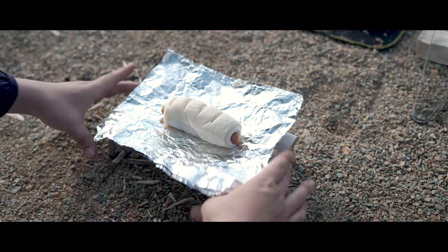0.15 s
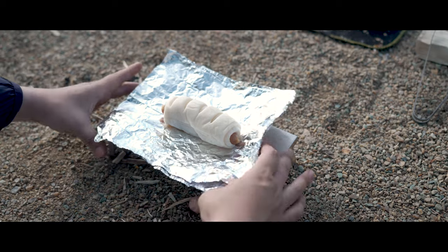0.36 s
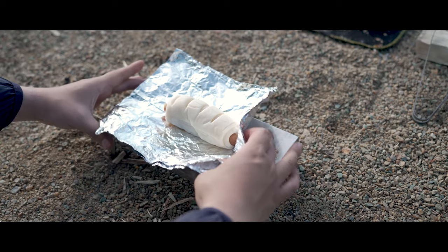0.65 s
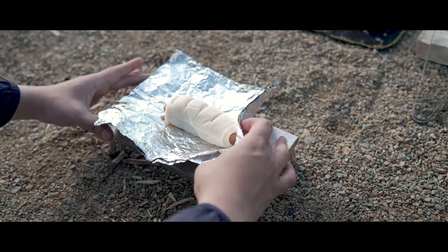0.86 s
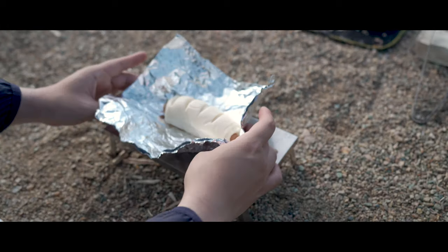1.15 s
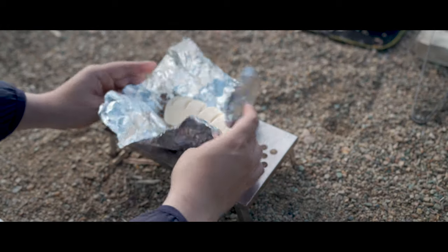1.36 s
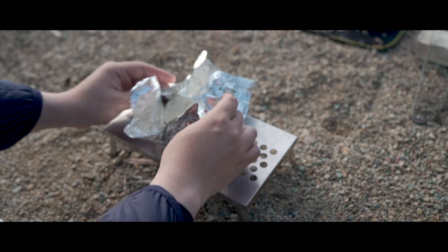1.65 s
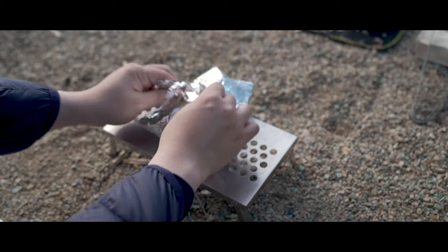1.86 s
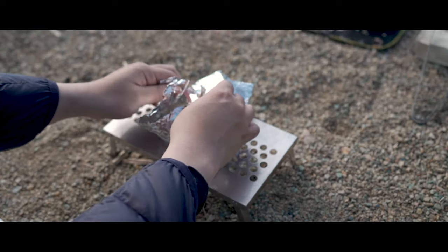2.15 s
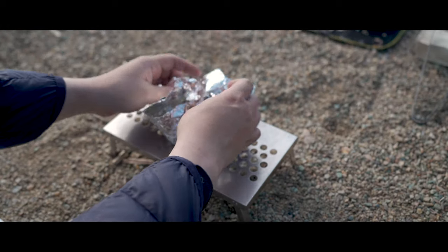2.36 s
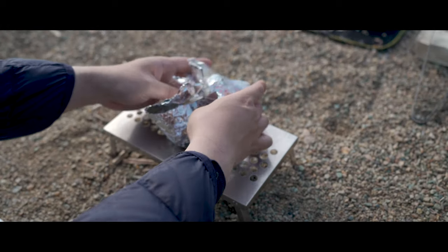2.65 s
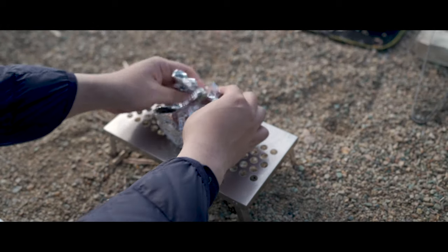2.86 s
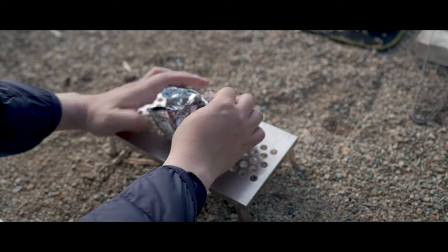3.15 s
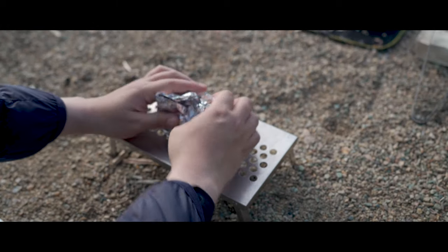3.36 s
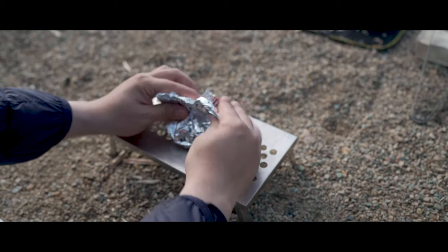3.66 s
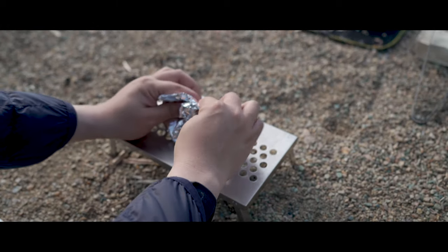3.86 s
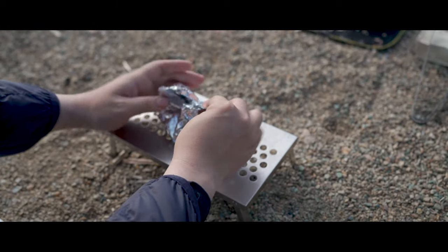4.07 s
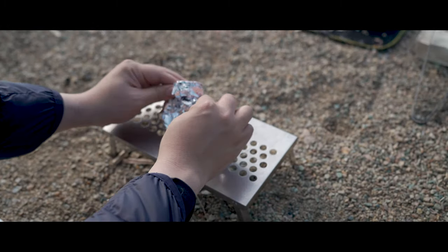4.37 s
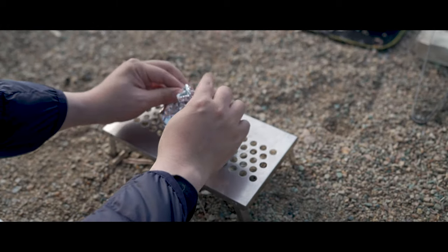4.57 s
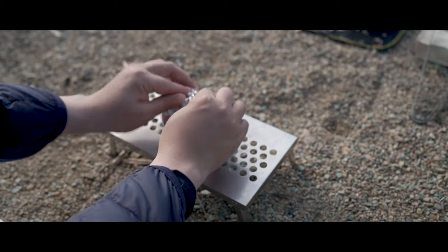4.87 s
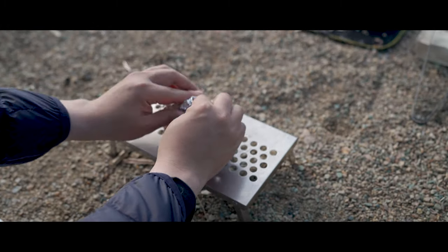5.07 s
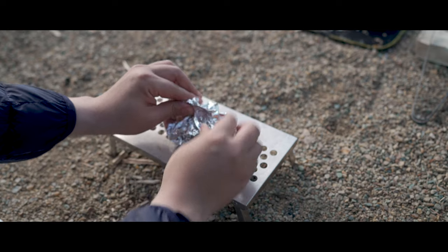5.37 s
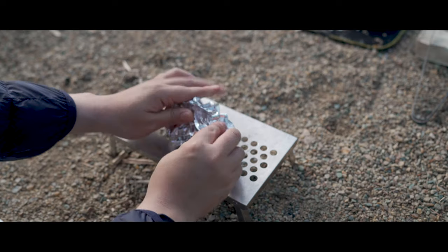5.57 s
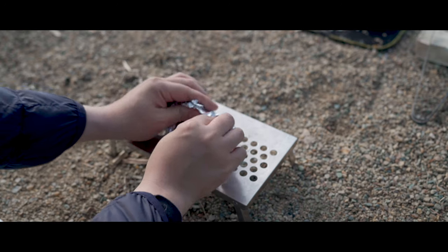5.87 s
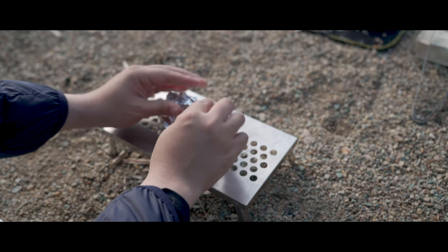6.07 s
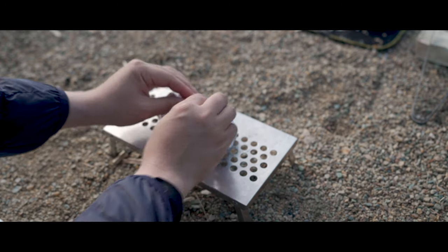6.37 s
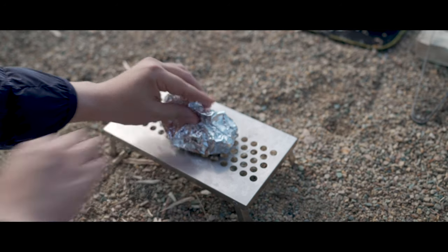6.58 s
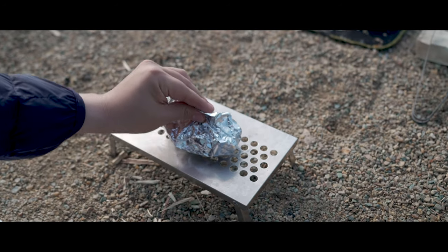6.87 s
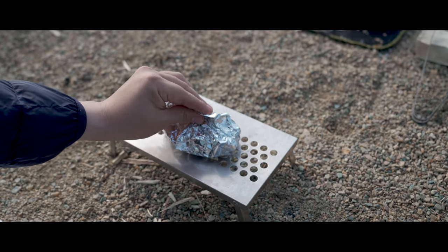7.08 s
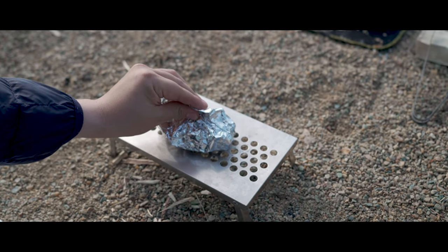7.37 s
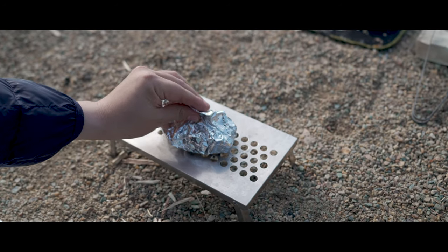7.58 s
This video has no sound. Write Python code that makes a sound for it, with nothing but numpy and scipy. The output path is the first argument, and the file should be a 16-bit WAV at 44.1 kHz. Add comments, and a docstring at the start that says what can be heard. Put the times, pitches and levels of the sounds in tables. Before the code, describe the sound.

Outdoors, close to the microphone, hands fold aluminium foil around food. The crinkling starts lightly, then comes in repeated squeezes of dense, bright crackle with sharp single snaps. The parcel taps a low metal table now and then and drags briefly across it once. Near the end the crackle thins out and a nylon sleeve swishes. A steady low rumble and occasional faint rasps lie behind.

```python
"""Outdoors at a low metal camp table, one microphone close to hands folding aluminium foil around food.
A steady low rumble fills the air; a nylon sleeve swishes and a narrow rasp comes now and then.
The parcel taps the table and drags over it once, ringing the metal. In front, each squeeze buckles
small creases in a dense crackle that the folded sheet colours, and single creases flip in loud snaps."""
import sys
import numpy as np
from scipy import signal
from scipy.fft import rfft, irfft
from scipy.io import wavfile
from scipy.ndimage import uniform_filter1d

SR = 44100
rng = np.random.default_rng(int(sys.argv[2]) if len(sys.argv) > 2 else 0)


def put_to_file(sound):
    """Save the sound as 16-bit audio at rate SR, in the file named by the first command-line argument."""
    columns = np.atleast_2d(sound).T  # one column per channel
    safe = np.clip(columns, -1, 1)
    whole_steps = np.round(safe * 32767)
    wavfile.write(sys.argv[1], SR, whole_steps.astype(np.int16))


N = 340893


def from_db(db):
    return 10 ** (np.asarray(db) / 20)


def rms_one(x):
    return x / np.sqrt(np.mean(x ** 2) + 1e-20)


def peak_one(x):
    return x / abs(x).max()


def in_time(rows):
    """Rows of (time [s], values...) as one curve per value, sample by sample."""
    times, *columns = np.transpose(rows)
    return [np.interp(np.arange(N) / SR, times, column) for column in columns]


def at_hz(spectrum, hz):
    """Level of a spectrum at hz, on a log frequency axis."""
    points_hz, db = np.transpose(spectrum)
    return np.interp(np.log(hz), np.log(points_hz), db)


def drift(rate_hz):
    """Slow random wander: noise at every 20th sample through a double one-pole low-pass; rms 1."""
    r = np.exp(-2 * np.pi * rate_hz * 20 / SR)
    slow = signal.lfilter([1], [1, -2 * r, r * r], rng.standard_normal(N // 20 + 2002))[2000:]
    return np.interp(np.arange(N) / 20, np.arange(len(slow)), rms_one(slow))


def coloured_noise(spectrum):
    """Steady noise with the given spectrum; rms 1."""
    hz = np.maximum(np.fft.rfftfreq(N, 1 / SR), 1)
    return rms_one(irfft(rfft(rng.standard_normal(N)) * from_db(at_hz(spectrum, hz)), N))


def band(x, low_hz, high_hz):
    return signal.sosfilt(signal.butter(2, [low_hz, high_hz], "band", fs=SR, output="sos"), x)


def resonator(hz, width_hz):
    """Coefficients of a two-pole resonance with gain 1 at its peak."""
    r = np.exp(-np.pi * width_hz / SR)
    return (1 - r * r) / 2 * np.array([1, 0, -1]), [1, -2 * r * np.cos(2 * np.pi * hz / SR), r * r]


def resonance(x, hz, width_hz):
    return signal.lfilter(*resonator(hz, width_hz), x)


def gliding_resonance(x, hz, width_hz):
    """A resonance whose centre moves every 256 samples."""
    out, state = np.zeros(N), np.zeros(2)
    for i in range(0, N, 256):
        out[i:i + 256], state = signal.lfilter(*resonator(hz[i], width_hz), x[i:i + 256], zi=state)
    return out


def fading(kicks, t60):
    """Each kick jumps up and dies away."""
    return signal.lfilter([1], [1, -from_db(-60 / (SR * t60))], kicks + 1e-18)


def gate(start_s, length_s, ramp_s):
    """A window that fades in and out in straight ramps."""
    t = np.arange(N) / SR
    return np.clip(np.minimum(t - start_s, start_s + length_s - t) / ramp_s, 0, 1)


# The open air around the table: (frequency [Hz], relative level [dB])
AIR_SPECTRUM = [(15, -61), (25, -37), (76, 0), (200, -7.5), (248, -6), (284, -7), (371, -13.5),
                (425, -18.5), (604, -19), (1360, -28), (2390, -30.5), (3050, -33), (3300, -31.5),
                (3680, -33.5), (15800, -74)]


def air_rumble(level_db):
    """A steady low rumble behind everything."""
    return from_db(level_db) * coloured_noise(AIR_SPECTRUM)


# The sleeve brushing, at the start and near the end: (time [s], level [dB])
SLEEVE_LEVELS = [(0, -42.5), (.2, -48), (.5, -82), (6.4, -58), (6.6, -36.5), (6.9, -35.5), (7.05, -44),
                 (7.2, -59.5), (7.73, -71)]
# The hiss of nylon: (frequency [Hz], relative level [dB])
SLEEVE_SPECTRUM = [(1470, -15.5), (2500, -15), (3330, -17), (3970, -12), (7190, -9), (15800, -16)]


def sleeve_swish():
    """Brushing nylon gives a bright hiss whose level wavers slightly."""
    level_db = in_time(SLEEVE_LEVELS)[0] + 1.1 * drift(25)
    return from_db(level_db) * coloured_noise(SLEEVE_SPECTRUM)


# Short rasps, faint at the microphone: (time [s], length [s], level [dB])
RASP_BURSTS = [(0.621, 0.13, -64), (2.406, 0.15, -43), (3.771, 0.13, -44.5), (4.693, 0.089, -56),
               (5.303, 0.21, -48), (6.113, 0.154, -49.5), (6.743, 0.18, -45), (7.569, 0.096, -46)]


def rasps(hz, width_hz, pulses_per_s):
    """Narrow-band noise throbs in uneven pulses."""
    envelope = sum(from_db(db) * gate(s, length_s, ramp_s=0.034) for s, length_s, db in RASP_BURSTS)
    cycles = np.cumsum(pulses_per_s * (1 + .15 * drift(31.2))) / SR
    throb = 1 + 0.44 * np.sin(2 * np.pi * cycles)
    narrow = resonance(resonance(rng.standard_normal(N), hz, width_hz), hz, width_hz)
    return envelope * throb * rms_one(narrow)


# Modes of the metal table top: (frequency [Hz], t60 [s])
TABLE_MODES = [(560, 0.014), (900, 0.018), (1230, 0.086), (1750, 0.028), (2340, 0.017)]
# The parcel taps the table: (time [s], peak level [dB], favoured pitch [Hz], hollow body gain [dB])
TABLE_TAPS = [(0.689, -30, 650, -19), (1.838, -21, 2090, -24), (1.864, -24, 2597, -33),
              (2.45, -11, 2340, -8), (2.688, -20.5, 1780, -18), (2.736, -18.5, 2183, -5.5),
              (3.184, -23, 2570, -7), (3.547, -26, 2150, -22), (4.371, -26.5, 2077, -29.5),
              (4.575, -28, 1780, -22), (6.031, -22.5, 1740, -32), (6.441, -27.5, 688.3, -30)]


def table_taps():
    """A dull tap: a puff of noise and the table's modes, strongest near the pitch the spot favours."""
    out, t = np.zeros(N + 4096), np.arange(4096) / SR
    for s, peak_db, pitch_hz, body_db in TABLE_TAPS:
        puff = rng.standard_normal(4096) * from_db(-60 * t / .02) * np.minimum(t / .002, 1)
        tap = from_db(-7.5) * peak_one(band(puff, 600, 2400))
        for hz, t60 in TABLE_MODES:
            strength = from_db(-40 * abs(np.log(hz / pitch_hz))) + from_db(body_db) * (hz < 1000)
            envelope = from_db(-60 * t / t60) * np.minimum(t / 0.00092, 1)
            tap += strength * np.sin(2 * np.pi * hz * t) * envelope
        start = round(s * SR)
        out[start:start + 4096] += from_db(peak_db) * peak_one(tap)
    return out[:N]


def table_scrape(start_s, length_s, level_db, catches_per_s):
    """The parcel drags: uneven catches of foil on metal set all but the lowest table mode buzzing."""
    catches = rng.standard_normal(N) * (rng.random(N) < catches_per_s / SR) + 1e-18
    buzz = sum(resonance(catches, hz, width_hz=9.8 / t60) for hz, t60 in TABLE_MODES[1:])
    return from_db(level_db) * gate(start_s, length_s, ramp_s=0.032) * rms_one(buzz)


# Fingers press the foil; levels are relative:
# (time of full push [s], hold [s], level [dB], low share [dB], top share [dB])
FINGER_SQUEEZES = [(0.232, 0.0092, -41, -12, 0), (0.29, 0.0047, -41, -5.5, 3), (0.351, 0.0, -41.5, -14, 4),
                   (0.405, 0.0, -38, -14, -1), (0.49, 0.011, -35.5, -15, 4.5), (0.55, 0.034, -41.5, -14, 4),
                   (0.679, 0.015, -31.5, -6.5, 1), (0.782, 0.049, -46.5, -9, 4),
                   (0.972, 0.032, -33, -10, -1), (1.063, 0.077, -36, -11, 0), (1.194, 0, -30, -13.5, -1),
                   (1.262, 0.019, -29.5, -11, -1.5), (1.402, 0.014, -27.5, -15, -1.5),
                   (1.489, 0.011, -26.5, -17.5, -3.5), (1.501, 0.18, -31.5, -10.5, 1.5),
                   (1.761, 0.15, -28, -10.5, 0.5), (1.961, 0.016, -28.5, -10.5, 0),
                   (2.159, 0.093, -34, -8.5, 0.5), (2.263, 0.083, -32, -12.5, 0),
                   (2.42, 0.055, -29.5, -8.5, -2.5), (2.574, 0.0, -30, -10.5, -2),
                   (2.664, 0.079, -29.5, -7.5, 0), (2.785, 0.21, -28.5, -9, -0.5),
                   (3.032, 0.15, -33.5, -14, 0), (3.153, 0.043, -28.5, -8.5, -3),
                   (3.382, 0.12, -30.5, -9, 0.5), (3.546, 0.0091, -25, -14, 0),
                   (3.636, 0.036, -30.5, -16.5, 1.5), (3.699, 0.073, -36.5, -23.5, 1.5),
                   (3.768, 0.1, -28, -12, -2), (4.008, 0.034, -28, -11.5, 0),
                   (4.165, 0.0094, -33.5, -11, -2), (4.25, 0.129, -30, -12.5, 0.5),
                   (4.439, 0.0068, -30.5, -15, 0), (4.58, 0.026, -26.5, -11, 0),
                   (4.684, 0.075, -32.5, -12, 0.5), (4.809, 0.062, -38, -10.5, 0),
                   (4.924, 0.023, -30.5, -13, -2.5), (5.112, 0.052, -33, -10.5, -2),
                   (5.253, 0.011, -34.5, -18, 2), (5.324, 0.049, -35.5, -6.5, -2),
                   (5.522, 0.12, -34.5, -12, -2), (5.736, 0.11, -33.5, -15.5, 0),
                   (5.99, 0.01, -39, -11.5, 3.5), (6.177, 0.042, -41, -4.5, -4),
                   (6.209, 0.12, -37.5, -14, -3), (6.442, 0.0, -32.5, -11.5, -5),
                   (6.567, 0.4, -42, -8.5, -7), (7.674, 0.014, -46.5, -3.5, -6.5)]
# The lighter touch between squeezes: (time [s], relative level [dB])
RESTING_TOUCH = [(0, -57.5), (2, -40), (4.3, -37), (5, -48), (6.5, -50), (7.25, -64), (7.73, -56.5)]


def finger_pressure(rise_db_per_s=221, fall_db_per_s=273):
    """Squeezes swell, hold and let go: curves of the crackle's level, low share and top share in dB."""
    t = np.arange(0, N + 64, 64) / SR
    s, hold_s, db, low_db, top_db = np.transpose(FINGER_SQUEEZES)[:, :, None]
    before_s, after_s = np.maximum(s - t, 0), np.maximum(t - s - hold_s, 0)
    power = from_db(2 * (db - rise_db_per_s * before_s - fall_db_per_s * after_s)) + 1e-30
    total = power.sum(axis=0)
    resting_power = from_db(2 * np.interp(t, *np.transpose(RESTING_TOUCH)))
    level_db = 10 * np.log10(total + resting_power)
    shares_db = [(power * share).sum(axis=0) / total for share in (low_db, top_db)]
    return in_time(np.transpose([t, level_db, *shares_db]))


# The sheet's changing shape: (time [s], lower ring [Hz], lower ring gain [dB], upper ring gain [dB])
SHEET_RINGS = [(0, 4900, -2, 9), (.35, 4900, 6, 7), (.62, 4920, 7.5, 3), (.75, 4600, 4, 4.5),
               (1.25, 4460, 0, 4.5), (1.9, 4500, 2, 5), (2.4, 4500, 3, 3.5), (3, 4300, 1.5, 3.5),
               (3.7, 4597, -0.5, 5.5), (4.2, 4150, 4, 3.5), (4.7, 4290, 5, 4.5), (5.2, 4308, 5, 5),
               (5.7, 4100, 3.5, 2.5), (5.95, 4200, 5, 8), (6.2, 4245, 1.5, 5), (6.5, 4400, 3.5, -1),
               (7.1, 4380, 0, 3.5), (7.73, 4400, 3, 0)]


def folded_sheet(crackle, upper_hz=6570):
    """Two resonances of the sheet colour the crackle; the lower one glides as the shape changes."""
    lower_hz, lower_db, upper_db = in_time(SHEET_RINGS)
    lower = (from_db(lower_db) - 1) * gliding_resonance(crackle, lower_hz, width_hz=440)
    upper = (from_db(upper_db) - 1) * resonance(crackle, upper_hz, width_hz=550)
    return crackle + lower + upper


# Colour of the crackle, heard close: (frequency [Hz], relative level [dB])
FOIL_SPECTRUM = [(530, -5), (900, -7), (1530, -8), (2350, -1), (3490, -4), (4030, 1.5), (5500, -1.5),
                 (6660, 0.5), (15100, 2), (15800, -5)]


def foil_crackle(firm_per_s, spread_db, colour_db, rise_s, t60, tail_t60, tail_db, hiss_db):
    """Small creases give way in clumps, each a noise burst of a few ms with a colour of its own."""
    level_db, low_db, top_db = finger_pressure()
    touch_db = level_db + 31   # 0 at a firm squeeze; a lighter touch gives fewer creases and less hiss
    creases_per_s = firm_per_s * from_db(3 * drift(60) + 0.4 * touch_db)
    onsets = np.flatnonzero(rng.random(N) < creases_per_s / SR)
    size = np.zeros(N)
    size[onsets] = from_db(spread_db * np.minimum(rng.exponential(1, len(onsets)), 2.8))
    size /= np.sqrt(uniform_filter1d(size ** 2, size=2000) + 1e-4)   # creases of a moment share the push
    log_pitch = rng.uniform(np.log(2500), np.log(16000), len(onsets))   # small patches high, large low
    white, out = rng.standard_normal((2, N)), np.zeros(N)
    edges_hz = np.geomspace(600, 17000, 15)
    for k, (low_hz, high_hz) in enumerate(zip(edges_hz, edges_hz[1:])):
        hz, kicks = np.sqrt(low_hz * high_hz), np.zeros(N)
        off_pitch = np.minimum(abs(np.log(hz) - log_pitch), 1.2)
        scatter_db = colour_db * rng.standard_normal(len(onsets))
        kicks[onsets] = size[onsets] * from_db(-14 * off_pitch + scatter_db)
        stretch = (6000 / hz) ** .5   # the decay times hold at 6 kHz; lows ring on longer
        bursts = rms_one(fading(fading(kicks, t60 * stretch), rise_s * np.log(1000)))
        shiver = from_db(tail_db) * rms_one(fading(kicks, tail_t60 * stretch))   # of the whole sheet
        hiss = from_db(hiss_db + 0.11 * touch_db)   # fingers slide over the foil
        lowness = np.clip(np.log(4200 / hz) / 0.25, 0, 1)   # how far under the foil's own treble
        share_db = lowness * (low_db + 9.5) + top_db * (hz > 9000)
        share_db += 1.31 * drift(10.8)   # colour shifts as the folds move
        gain = from_db(at_hz(FOIL_SPECTRUM, hz) + share_db + level_db - 4.5)
        out += gain * band(white[k % 2] * (bursts + shiver + hiss), low_hz, high_hz)
    return out


# Creases that buckle loudest at the microphone:
# (time [s], relative level [dB], ring pitch [Hz], crack centre [Hz])
CREASE_SNAPS = [(0.2176, -23, 13700, 10800), (0.2387, -21, 14200, 13300), (0.3199, -23, 9800, 9100),
                (0.3516, -21, 7900, 9800), (0.4638, -15, 9600, 11100), (0.4867, -17, 13300, 11500),
                (0.5671, -20, 14300, 11800), (0.6212, -18, 10100, 11100), (0.6615, -16, 5100, 8100),
                (0.6964, -14, 6400, 7400), (0.7613, -24, 7400, 9500), (0.7863, -20, 7400, 9800),
                (0.8175, -14, 15200, 13400), (0.9513, -18, 14900, 10000), (0.9911, -16, 8200, 8200),
                (1.0965, -17, 12300, 12300), (1.1052, -13, 9300, 9100), (1.192, -12, 13000, 10200),
                (1.2487, -13, 4500, 8600), (1.2701, -12, 4300, 7000), (1.318, -20, 4600, 6800),
                (1.3327, -12, 15100, 12300), (1.364, -18, 12000, 8600), (1.3689, -17, 7000, 6300),
                (1.3891, -13, 14200, 9800), (1.4146, -8, 9300, 8800), (1.4192, -11, 7900, 8600),
                (1.449, -14, 11700, 8700), (1.4885, -9, 11700, 8900), (1.6659, -14, 13800, 11400),
                (1.6741, -16, 12400, 10100), (1.702, -6, 6600, 7900), (1.7988, -12, 14500, 11700),
                (1.8597, -10, 14800, 8400), (1.8658, -4, 9000, 7900), (1.8864, -5, 11500, 10100),
                (2.1476, -19, 4400, 5500), (2.2822, -12, 3900, 7100), (2.3289, -15, 14800, 8700),
                (2.4908, -12, 8700, 9000), (2.5152, -9, 15300, 12600), (2.6367, -16, 5600, 6700),
                (2.7569, -11, 13000, 10400), (2.7802, -10, 8100, 9600), (2.9498, -9, 6800, 8100),
                (2.9762, -9, 13900, 11500), (3.0218, -12, 11500, 9700), (3.0277, -12, 4000, 9000),
                (3.0503, -9, 13300, 9800), (3.1121, -14, 11600, 10400), (3.135, -9, 10900, 8900),
                (3.1655, -10, 7800, 7500), (3.3717, -15, 8200, 9500), (3.5118, -9, 7100, 8000),
                (3.6247, -14, 6400, 7700), (3.9401, -5, 6800, 6900), (3.9819, -10, 14900, 12100),
                (4.3348, -10, 4400, 8000), (4.3619, -7, 6800, 9300), (4.3733, -7, 15500, 11400),
                (4.4541, -12, 9800, 10400), (4.478, -16, 9900, 8900), (4.5011, -12, 7200, 9000),
                (4.6069, -9, 7100, 8400), (4.6578, -13, 13500, 11700), (4.7138, -10, 6900, 9400),
                (4.7366, -12, 6600, 8800), (4.8044, -16, 11800, 9600), (4.8206, -6, 14200, 12500),
                (5.0513, -8, 9100, 9700), (5.1281, -13, 6700, 7000), (5.1371, -8, 6800, 6000),
                (5.2066, -17, 4100, 5800), (5.2484, -13, 11100, 11000), (5.2544, -11, 4300, 6500),
                (5.2679, -17, 13800, 10700), (5.2795, -17, 14300, 13100), (5.3181, -10, 12200, 8600),
                (5.3816, -12, 13600, 11500), (5.5186, -15, 4000, 5800), (5.524, -16, 14500, 13000),
                (5.5515, -15, 12400, 8500), (5.5588, -16, 6600, 7600), (5.6702, -15, 6800, 7300),
                (5.6994, -12, 6300, 8800), (5.74, -15, 6800, 8600), (5.7678, -14, 6800, 8600),
                (5.7827, -6, 12900, 11200), (5.8019, -5, 9600, 8800), (5.9164, -18, 8200, 8500),
                (6.0166, -14, 6300, 8000), (6.0312, -11, 4700, 6200), (6.2083, -17, 13600, 10200),
                (6.2857, -18, 9400, 9200), (6.443, -15, 6300, 7400), (6.568, -21, 9900, 9600),
                (6.7064, -13, 6700, 8600), (7.2812, -38, 4600, 4300), (7.6761, -23, 8200, 7500),
                (7.7116, -29, 7800, 7700)]


def crease_snaps(rise_s, t60, tail_t60, tail_db):
    """A crease flips: a crack about a millisecond long and a ring at the pitch of the freed patch."""
    out, t = np.zeros(N + 2048), np.arange(2048) / SR
    decay = from_db(-60 * t / t60) + from_db(tail_db - 60 * t / tail_t60)
    envelope = np.minimum(t / rise_s, 1) * decay
    for s, level_db, ring_hz, crack_hz in CREASE_SNAPS:
        burst = rng.standard_normal(2048) * envelope
        ring = peak_one(resonance(burst, ring_hz, width_hz=0.059 * ring_hz))
        ring_db = -8 * abs(np.log(ring_hz / crack_hz))
        edges_hz = .5 * crack_hz, min(2.15 * crack_hz, 17000)
        crack = peak_one(band(band(burst, *edges_hz), *edges_hz))   # twice: a tiny patch has no lows
        snap = peak_one(from_db(ring_db) * ring + from_db(4) * crack)
        start = round((s - rise_s) * SR)
        out[start:start + 2048] += from_db(level_db) * snap
    return out[:N]


def scene():
    """Foil in front; table, sleeve, rasps and open air behind it, in mono."""
    crackle = foil_crackle(firm_per_s=600, spread_db=4.5, colour_db=5, rise_s=0.00042, t60=0.0056,
                           tail_t60=0.063, tail_db=-4, hiss_db=-3)
    foil = folded_sheet(crackle) + crease_snaps(rise_s=0.0003, t60=0.002, tail_t60=0.044, tail_db=-24.5)
    table = table_taps() + table_scrape(start_s=2.63, length_s=0.22, level_db=-36, catches_per_s=360)
    behind = sleeve_swish() + rasps(hz=2280, width_hz=250, pulses_per_s=130) + air_rumble(level_db=-36)
    return (foil + table + behind)[None]


def record(dry):
    """The microphone's top end is cut steeply, 60 dB down from 16.2 kHz."""
    return signal.sosfilt(signal.cheby2(16, 60, 16200, fs=SR, output="sos"), dry)


dry = scene()
out = record(dry)
put_to_file(out)
```